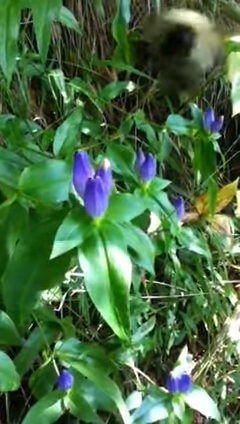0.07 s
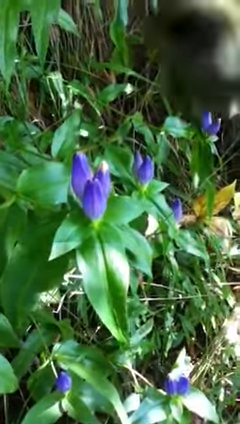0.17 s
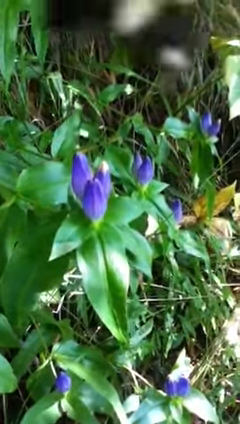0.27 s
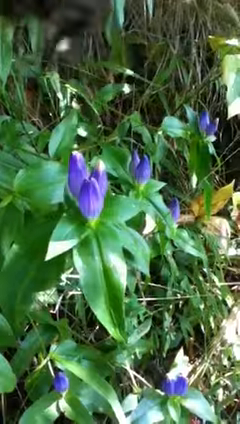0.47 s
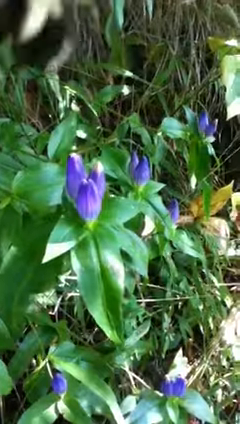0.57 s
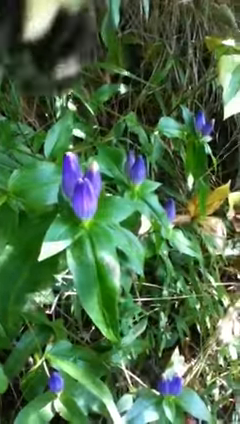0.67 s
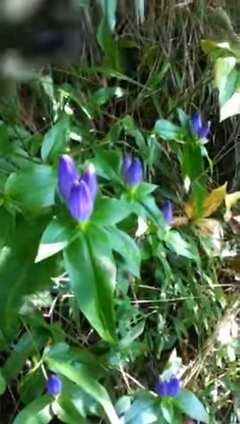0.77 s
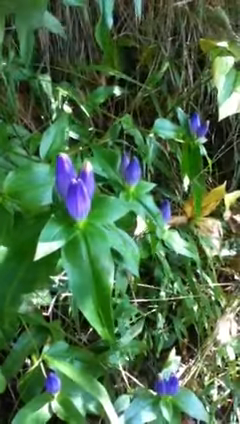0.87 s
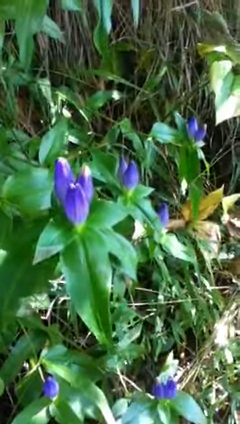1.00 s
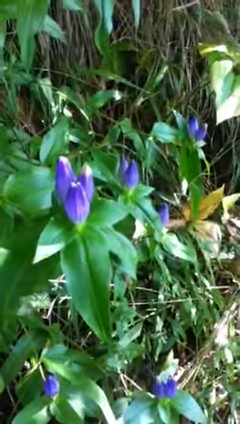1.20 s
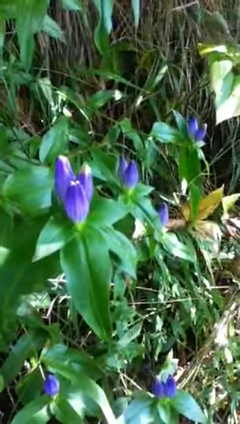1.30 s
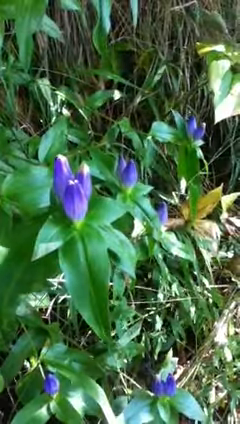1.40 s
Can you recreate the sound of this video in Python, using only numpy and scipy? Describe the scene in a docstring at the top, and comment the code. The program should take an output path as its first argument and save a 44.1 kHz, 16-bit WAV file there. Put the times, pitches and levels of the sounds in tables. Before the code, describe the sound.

The low, slightly raspy buzz of a bumblebee's wings swells, eases a little, then swells louder as it flies right by the microphone. A soft puff of air follows, and the buzz fades into faint outdoor hiss.

```python
"""A bumblebee flies among flowers, passes the microphone twice, the second time very close, and moves off.
Each wingbeat is one pressure pulse with a rasp of air on both strokes; the tone colour shifts as the bee turns.
Up close the wake of the wings ruffles the microphone. A faint outdoor hiss lies behind."""
import sys
import numpy as np
from scipy import signal
from scipy.fft import rfft, irfft
from scipy.io import wavfile
from scipy.ndimage import uniform_filter1d

SR = 44100
rng = np.random.default_rng(int(sys.argv[2]) if len(sys.argv) > 2 else 0)


def to_wav(sig):
    """Store sig (one row per channel, or 1-D mono) as 16-bit WAV at the path in sys.argv[1].

    Samples outside -1..1 are clipped; the rate is SR.
    """
    pcm = np.clip(np.atleast_2d(sig), -1, 1) * 32767
    pcm = np.round(pcm).astype(np.int16)
    wavfile.write(sys.argv[1], SR, pcm.T)  # frames by channels


N = 63945

# wingbeat rate: (s, Hz)
WINGBEAT = [(0.025, 170.4), (0.063, 177.5), (0.157, 173.9), (0.175, 182.2), (0.219, 182.2), (0.253, 172.6),
            (0.373, 170.3), (0.413, 176.5), (0.533, 174.6), (0.567, 170), (0.599, 176.1), (0.629, 170.4),
            (0.653, 176.1), (0.743, 176.8), (0.777, 172.8), (0.925, 176.9), (0.945, 171.6), (1.061, 179.7),
            (1.077, 175.1), (1.231, 172.5), (1.255, 166.8), (1.285, 172.5), (1.359, 168), (1.383, 161.3),
            (1.399, 170.6), (1.42, 172.5)]
# level of the fundamental, rising as the bee nears: (s, dB)
HUM = [(0.015, -45.5), (0.057, -45.5), (0.223, -23), (0.313, -20.5), (0.625, -27), (0.857, -13.5), (0.935, -12),
       (0.979, -15.5), (1.049, -14.5), (1.191, -31.5), (1.211, -30.5), (1.341, -41), (1.43, -35.5)]
# level of the second harmonic: (s, dB)
OCTAVE = [(0.0, -41.5), (0.058, -34), (0.134, -35), (0.258, -25), (0.314, -24), (0.48, -28), (0.628, -27),
          (0.88, -19), (0.954, -19.5), (1.07, -15.5), (1.15, -22.5), (1.21, -31.5), (1.298, -38.5), (1.37, -40), (1.43, -35.5)]
# level of the third harmonic: (s, dB)
TWELFTH = [(0.0, -79), (0.038, -46.5), (0.102, -60), (0.174, -39.5), (0.282, -33.5), (0.434, -37.5), (0.47, -45),
           (0.584, -39.5), (0.672, -43), (0.86, -25.5), (1.05, -21), (1.078, -26.5), (1.13, -22), (1.15, -30),
           (1.326, -45.5), (1.43, -42.5)]
# level of the sixth and higher harmonics: (s, dB)
BUZZ = [(0.0, -52), (0.054, -49.5), (0.158, -48.5), (0.262, -40.5), (0.54, -47), (0.776, -40), (0.792, -37), (0.844, -38.5),
        (0.852, -34.5), (0.974, -37.5), (1.014, -35), (1.134, -42), (1.21, -53.5), (1.226, -46), (1.33, -61), (1.43, -52.5)]
# level of the air rasp: (s, dB)
RASP = [(0.0, -50), (0.158, -47.5), (0.206, -44.5), (0.488, -43), (0.504, -45), (0.912, -41.5), (0.97, -44.5), (1.038, -43.5),
        (1.078, -46), (1.158, -43), (1.262, -58), (1.43, -55.5)]
# one wingbeat, the n-th row sounding the n-th harmonic: (order setting the phase lag, dB seen head-on, dB
# change seen from behind)
HARMONICS = [(1, 18.5, 0), (1.98, 20.5, 0), (2.9, 10, 0), (4.2, -7.5, 0), (5, -16.5, 0), (6.15, -24, 7), (6.95, -25.5, 7.5), (7.95, -16, -15), (8.8, -27.5, -4.5), (9.75, -33.5, -1.5), (10.8, -40, 7.5), (12.07, -26, -15.5), (14.04, -32, -7), (13.9, -32, -10.5), (14.83, -37.5, 0), (16.26, -39, -3), (16.6, -42, -10), (17.84, -31.5, -9), (18.5, -35.5, -9), (19.7, -34, -3.5), (20.7, -39.5, -6), (22.25, -37.5, -5), (23.7, -46.5, 7), (24.96, -39.5, -0.5), (25.1, -36.5, -10.5)]
BUZZ_DB, RASP_DB = 3.1, -0.5
JITTER_HZ, JITTER_PER_S = 0.86, 64   # unevenness from beat to beat
TURN_DB, TURNS_PER_S = 1.86, 4.2   # upper harmonics wander as the body turns
# air rasp of the wings: (Hz, dB per Hz)
RASP_COLOUR = [(300, -14), (1500, 4), (2500, 0), (3600, 1.5), (5000, 1), (7000, 1), (9500, 0.5), (12500, -5), (16000, -10)]
STROKE_SWING_DB, STRONG_STROKE_DB, STROKE_LAG_RAD = 3.5, 2, 0.65   # the rasp peaks twice a beat, one stroke stronger
# eddies shed by the wings: (Hz, dB per Hz)
EDDY_COLOUR = [(40, -36), (90, -26), (150, 4.5), (220, -0.5), (400, -4), (800, -7), (1300, -10), (1900, -25.5), (2700, -24), (3700, -24.5), (5200, -32), (9000, -47)]
EDDY_DB, EDDY_GROWTH = -31.5, 1.23   # at the closest pass; dB per dB of nearness
# the wake hits the microphone: (s, length s, dB)
PUFFS = [(0.173, 0.0076, -49), (0.935, 0.03, -72), (1.085, 0.016, -36), (1.138, 0.013, -43)]
# (Hz, dB per Hz)
PUFF_COLOUR = [(20, -22), (40, -26), (65, 11), (120, -9), (300, 2), (900, -20), (3000, -46)]
# outdoor background: (Hz, dB per Hz)
AIR_COLOUR = [(20, -28), (70, 1), (250, 11), (700, 8), (1500, 1.5), (3000, -2.5), (9000, -8.5), (16000, -19)]
AIR_DB = -51
CUTOFF_HZ = 15900   # fixed
# harder strokes (a faster beat) turn the tone nasal: (harmonic, dB per Hz above the mean rate)
EFFORT = [(7, -0.04), (8, -0.5), (9, 1.37), (12, -0.13), (13, 1)]
RASP_FLICKER_DB, FLICKER_PER_S = 1.1, 290
# the wings flutter roughly in a change of course: (s, length s, dB more eddies)
FLUTTERS = [(0.26, 0.0041, 2), (0.377, 0.042, 7), (0.601, 0.012, 5), (1.117, 0.011, 6.5)]
# how far the bee has turned its tail to the microphone: (s, share 0-1)
TURNED_AWAY = [(0, 0.45), (0.18, 0.3), (0.3, 0.3), (0.5, 0.0), (0.72, 0.3), (0.88, 0.51), (1.05, 0.83), (1.43, 0.86)]
PULSE_SPREAD_RAD = 0.0406   # higher harmonics lag: the pulse is smeared over the stroke
GRAIN_DB, GRAINS_PER_S = -0.5, 2200   # the rasp crackles finely
# level of the fourth harmonic: (s, dB)
FOURTH = [(0.0, -49), (0.358, -29.5), (0.52, -35.5), (0.728, -34), (0.804, -27.5), (0.944, -24.5), (0.978, -34.5),
          (1.042, -26), (1.094, -59), (1.122, -48), (1.198, -59), (1.25, -44.5), (1.322, -61), (1.43, -57)]
# level of the fifth harmonic: (s, dB)
FIFTH = [(0.0, -68), (0.038, -47), (0.11, -50), (0.222, -33), (0.382, -44.5), (0.41, -39.5), (0.636, -41), (0.676, -34.5),
         (0.9, -27.5), (0.974, -34.5), (1.03, -29.5), (1.082, -59), (1.13, -34), (1.154, -46), (1.33, -54.5), (1.43, -52)]
LOW_CUT_HZ = 40   # the microphone loses the deepest bass


def from_db(db):
    """Decibels to gain."""
    return 10 ** (np.asarray(db) / 20)


def rms_one(x):
    """Scale to unit rms."""
    return x / np.sqrt(np.mean(x ** 2) + 1e-20)


def in_time(rows):
    """A control curve at every sample, its corners rounded."""
    s, values = np.transpose(rows)
    return uniform_filter1d(np.interp(np.arange(N) / SR, s, values), size=400, mode="nearest")


def drift(rate):
    """Slow random wander of spread 1."""
    r = np.exp(-80 * np.pi * rate / SR)  # fixed
    slow = signal.lfilter([1], [1, -2 * r, r * r], rng.standard_normal(N // 40 + 2002))[2000:]  # fixed
    return np.interp(np.arange(N) / 40, np.arange(len(slow)), rms_one(slow))  # fixed


def noise(colour):
    """Noise of unit rms with the given spectrum."""
    hz, db = np.transpose(colour)
    bins = np.maximum(np.fft.rfftfreq(N, 1 / SR), 1)
    return rms_one(irfft(rfft(rng.standard_normal(N)) * from_db(np.interp(np.log(bins), np.log(hz), db)), N))


def pulse_phases(gains):
    """Phases that make the harmonics one causal pulse: a fast rise, then a slower fall."""
    cepstrum = irfft(np.log(np.r_[gains[1], gains]))
    cepstrum[len(gains):] = 0
    return 2 * rfft(cepstrum).imag[1:]


def wing_tone(beat):
    """Harmonics of the wingbeat, coloured by effort and by the way the bee faces."""
    orders, front_db, behind_db = np.transpose(HARMONICS)
    phases, out = pulse_phases(from_db(front_db)) - PULSE_SPREAD_RAD * (orders - 1) ** 2, 0
    effort, away = in_time(WINGBEAT) - in_time(WINGBEAT).mean(), np.clip(in_time(TURNED_AWAY), 0, 1)
    nasal = {round(order): slope for order, slope in EFFORT}
    gains = np.array([from_db(front_db[k] + away * behind_db[k] + nasal.get(k + 1, 0) * effort + TURN_DB * drift(TURNS_PER_S))
                      for k in range(len(orders))])
    levels = [in_time(HUM), in_time(OCTAVE), in_time(TWELFTH), in_time(FOURTH), in_time(FIFTH), in_time(BUZZ) + BUZZ_DB]
    groups = np.split(np.arange(len(orders)), [1, 2, 3, 4, 5])  # fixed
    for group, level_db in zip(groups, levels):
        waves = gains[group] * np.cos((group[:, None] + 1) * beat + phases[group, None])
        out = out + from_db(level_db) * waves.sum(axis=0) / np.sqrt((gains[group] ** 2).sum(axis=0) / 2)
    return out


def wing_air(beat):
    """Bright rasp and duller eddies, both pulsing with the up- and downstroke."""
    stroke = beat - STROKE_LAG_RAD
    gate = rms_one(from_db(STROKE_SWING_DB * np.cos(2 * stroke) + STRONG_STROKE_DB * np.cos(stroke)))
    nearness_db = in_time(OCTAVE) - in_time(OCTAVE).max()
    flutter_db = sum(db * swell(s, length) for s, length, db in FLUTTERS)
    grain = rms_one(from_db(RASP_FLICKER_DB * drift(FLICKER_PER_S) + GRAIN_DB * drift(GRAINS_PER_S)))
    rasp = from_db(in_time(RASP) + RASP_DB) * grain * noise(RASP_COLOUR)
    eddies = from_db(EDDY_DB + EDDY_GROWTH * nearness_db + flutter_db) * noise(EDDY_COLOUR)
    return gate * (rasp + eddies)


def wake():
    """Soft low puffs where the downwash reaches the microphone."""
    return noise(PUFF_COLOUR) * sum(from_db(db) * swell(s, length) for s, length, db in PUFFS)


def swell(s, length):
    """A bell-shaped swell of height 1."""
    return np.exp(-.5 * ((np.arange(N) / SR - s) / length) ** 2)


def scene():
    """The bee over the still outdoor air."""
    beat = 2 * np.pi * np.cumsum(in_time(WINGBEAT) + JITTER_HZ * drift(JITTER_PER_S)) / SR
    return (wing_tone(beat) + wing_air(beat) + wake() + from_db(AIR_DB) * noise(AIR_COLOUR))[None]


def record(dry):
    """The deep bass rolls off and the top is cut steeply."""
    thinned = signal.sosfiltfilt(signal.butter(2, LOW_CUT_HZ, "high", fs=SR, output="sos"), dry, padtype="even", padlen=2000)
    return signal.sosfiltfilt(signal.ellip(10, .05, 70, CUTOFF_HZ, fs=SR, output="sos"), thinned)  # fixed


dry = scene()
out = record(dry)
to_wav(out)
```